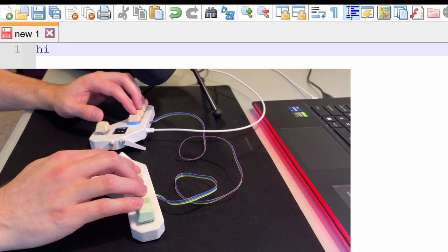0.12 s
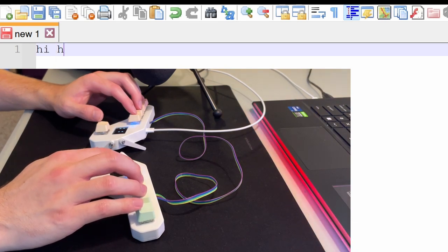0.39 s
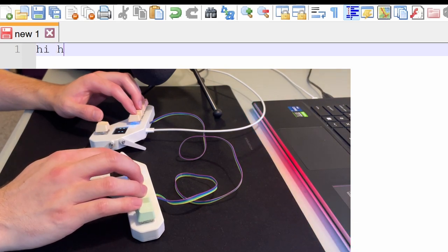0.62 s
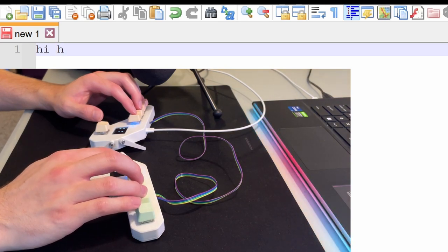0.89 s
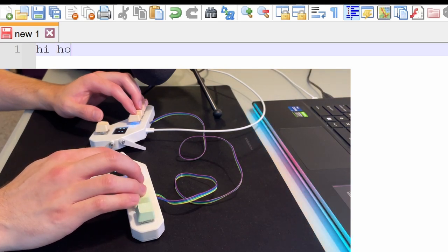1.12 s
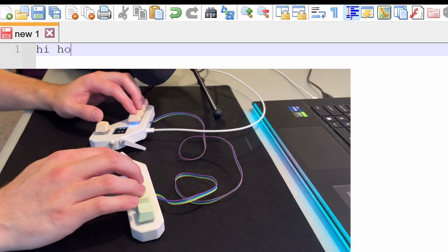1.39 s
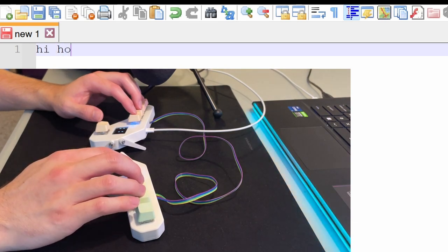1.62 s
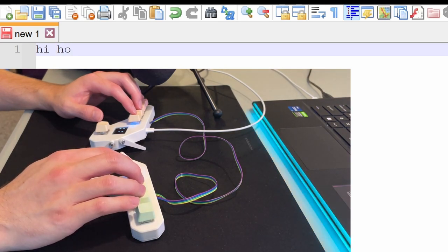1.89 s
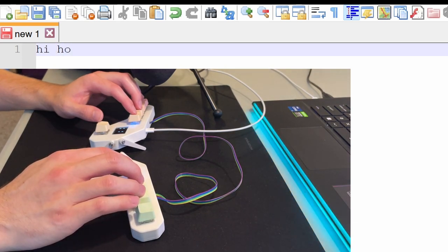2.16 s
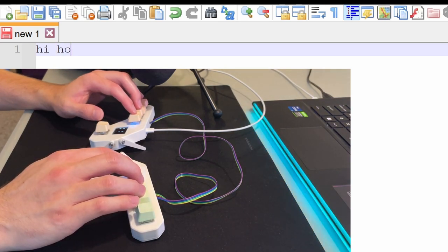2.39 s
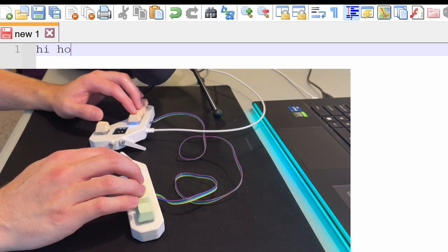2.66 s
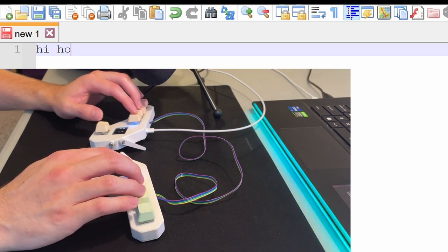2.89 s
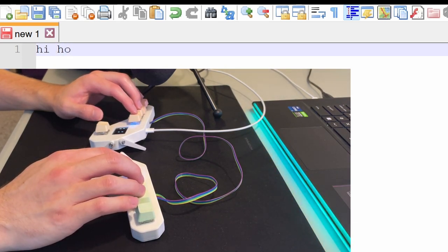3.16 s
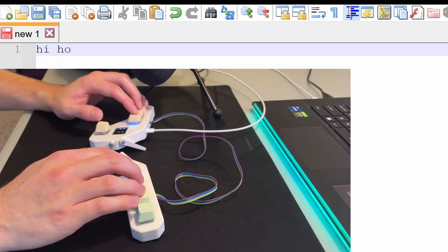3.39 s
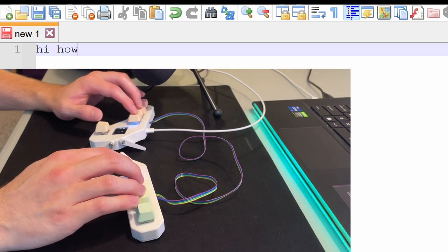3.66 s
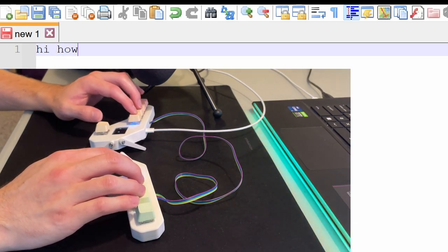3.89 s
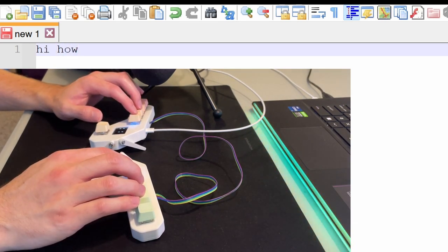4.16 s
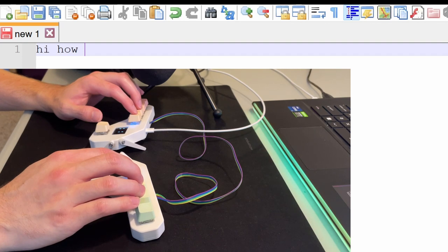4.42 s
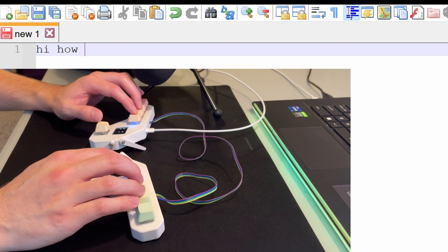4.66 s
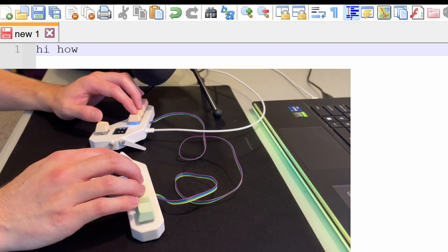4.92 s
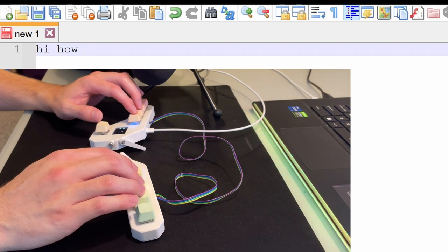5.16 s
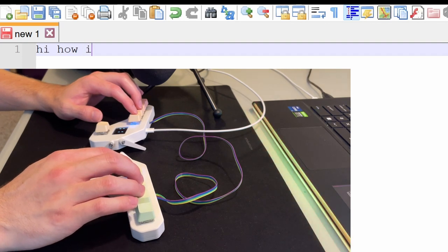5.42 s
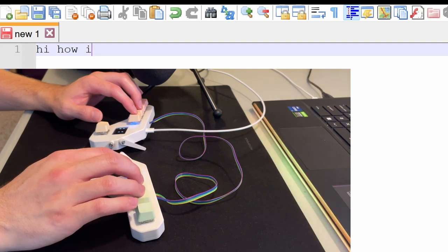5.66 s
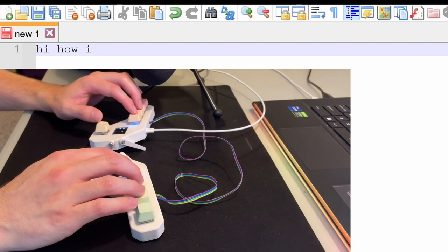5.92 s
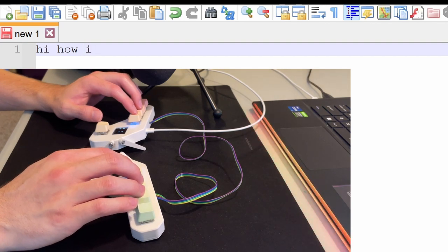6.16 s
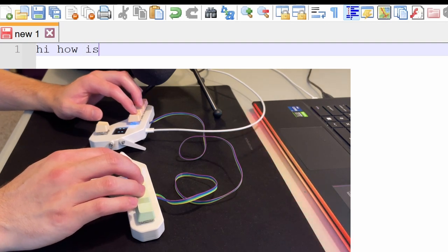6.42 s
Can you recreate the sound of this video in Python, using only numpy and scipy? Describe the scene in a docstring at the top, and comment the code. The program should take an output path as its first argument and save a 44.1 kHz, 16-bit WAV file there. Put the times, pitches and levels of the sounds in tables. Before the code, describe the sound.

Clicky mechanical key switches pressed slowly and unevenly on a desk, sharp bright snaps with duller plastic knocks, close up in a quiet room.

```python
"""Clicky key switches in a quiet room

Key switches in small plastic cases are pressed on a desk: each contact strikes sums of decaying sines,
a bright snap of click jacket and housing with a spring ping, and a duller knock of the stem.
Friction grains excite the same modes as keys travel; the desk sways at one low mode with a rumble.
Sparse reflections make the room, shaped noise the hiss. Two equal paths 11 ms apart double everything;
at times the stream freezes and its strongest tones hang on as steady sines."""
import sys
import numpy as np
from scipy import signal
from scipy.fft import rfft
from scipy.io import wavfile
from scipy.ndimage import uniform_filter1d

SR = 44100
rng = np.random.default_rng(int(sys.argv[2]) if len(sys.argv) > 2 else 0)


def to_wav(s):
    """Save 16-bit WAV."""
    ch = np.atleast_2d(s).T  # columns
    pcm = np.round(np.clip(ch, -1, 1) * 32767)  # PCM
    wavfile.write(sys.argv[1], SR, pcm.astype(np.int16))


def attenuation_scalar(level_db):
    """Turn a level in dB into a linear amplitude multiplier (20 dB per decade)."""
    decades = np.asarray(level_db, float) / 20
    return 10 ** decades


N = 288855

# Key contacts: (time [s], snap level [dB], knock level [dB], nominal contact length [ms])
CONTACTS = [(0.1788, -45, -51, .88), (.192, -13.5, -30, 0.34), (0.2001, -30, -21, 0.65),
            (0.209, -37, -35.5, .74), (0.2945, -32.5, -54, 0.13), (0.3348, -33, -38, 0.8),
            (0.344, -26, -33.5, 0.72), (0.347, -33.5, -42, 1.2), (0.353, -36, -29, 0.37),
            (0.956, -29, -29.5, 1.06), (0.9798, -40, -33, .22), (0.9834, -16, -35.5, 1.16),
            (.992, -27, -22.5, 0.84), (1.0002, -32, -31.5, 0.27), (1.0085, -34, -40, 0.36),
            (1.0958, -41, -53, 1.5), (1.1307, -30, -41, .86), (1.1343, -30.5, -34, 0.097),
            (2.2517, -20, -26, 0.68), (2.262, -4.5, -21, 0.31), (2.265, -24, -40, .5),
            (2.2718, -23.5, -12, 0.63), (2.4372, -45.5, -38, 0.9), (3.4491, -55, -44, 0.89),
            (3.4614, -43, -28.5, 1.2), (3.4762, -29.5, -44, .44), (3.4982, -2.5, -24, 0.68),
            (3.5024, -26, -40, .9), (3.5062, -17.5, -7.5, 0.67), (3.512, -30, -38, .62),
            (3.649, -18, -45, 0.25), (3.655, -10.5, -25, 0.58), (3.6638, -18.5, -26, .37),
            (3.679, -53.5, -36.5, 0.4), (3.8883, -41, -54.5, 0.44), (3.891, -35.5, -51, 0.58),
            (3.8958, -40, -60, 0.77), (3.9059, -24, -41, 0.4), (3.9112, -65, -42, 0.73),
            (3.9485, -22.5, -25.5, 0.47), (3.953, -31.5, -28, 0.34), (4.146, -45.5, -53, .57),
            (4.165, -38, -50, 0.7), (4.177, -14, -30.5, 0.68), (4.1965, -32, -50, 1.2),
            (4.3036, -37, -43.5, 1.3), (4.3215, -26, -32, 0.31), (4.3266, -52.5, -40.5, 1),
            (5.1545, -37.5, -40, 0.33), (5.1608, -11.5, -30, 0.48), (5.1677, -28, -23, 0.56),
            (5.275, -33, -52, .8), (5.302, -37, -43, 0.78), (5.305, -29, -42, 0.79),
            (5.3094, -46, -34, 0.53), (6.2251, -20.5, -25, 0.61), (6.2339, -19, -39.5, 0.41),
            (6.2368, -43, -22.5, 1.3), (6.2393, -3, -23.5, 0.54), (6.2453, -11, -5, 0.32),
            (6.2488, -21.5, -26.5, 0.28), (6.267, -55, -51, .45), (6.3467, -31, -44, .61),
            (6.3508, -32, -44, 0.93), (6.36, -21.5, -37, 0.29), (6.38, -22.5, -38, 1.1),
            (6.3832, -17, -26, 0.55), (6.3852, -45, -29, 1.13)]
# Knock, snap and cap colours from each time on:
# (time [s], main knock [Hz], snap colour [Hz], keycap mode [Hz], keycap mode level [dB])
COLOURS = [(0, 3770, 9800, 5300, -2), (.197, 2984, 10200, 1776, 1.5), (.27, 2920, 8300, 1700, -3),
           (.34, 4060, 8940, 1740, -2), (.35, 2895, 8300, 1700, -5), (.7, 2970, 8700, 1770, -20),
           (.975, 2440, 9170, 3530, -0.5), (1.07, 2990, 6660, 1880, -7), (2.1, 2400, 8550, 1261, -11),
           (3.4, 2830, 7800, 1800, -12), (3.49, 3180, 9140, 2270, 1.5), (3.63, 2806, 8300, 2030, -10.5),
           (3.85, 2365, 8300, 3690, -8), (4.12, 3410, 9600, 1834, -6.5), (4.26, 3180, 10600, 1760, -6.5),
           (5.1, 3700, 9470, 5200, -4.5), (5.165, 2950, 9070, 1840, -3.5), (5.25, 3060, 8560, 1710, -4),
           (6.15, 2430, 9070, 4560, -4.5), (6.32, 2400, 9100, 1500, -13), (6.375, 2416, 8150, 1500, -8)]
# Switch housing and keycap modes: (frequency [Hz], level [dB], T60 [s])
SNAP_MODES = [(5020, -6, 0.0052), (6350, -8.5, 0.012), (7660, 4.5, 0.0032), (8300, -0.5, 0.0024),
              (9820, 1, 0.0028), (10340, -6, 0.0086), (11270, -6.5, 0.0076), (12800, -9.5, .005),
              (14900, -11, 0.0027), (15400, -18, .004)]
# Plastic case modes, nominal for a main knock at NOMINAL_KNOCK_HZ: (frequency [Hz], level [dB], T60 [s])
CASE_MODES = [(1248, -9, .011), (1760, -12, 0.015), (2053, -2, .008), (2400, 1, 0.011),
              (2626, -4.5, 0.0061), (3093, -12.5, 0.0096), (3677, -10, 0.0081), (4420, -8.5, 0.0083)]
# Coil spring pinging on after a snap: (frequency [Hz], level [dB], T60 [s])
SPRING_MODES = [(7900, -38, .07), (9870, -39, .1), (10060, -39, .08)]
# Case on the desk mat: (frequency [Hz], level [dB], T60 [s])
THUD_MODES = [(125, -38, .08), (200, -34, 0.027), (330, -45.5, 0.04), (585, -40.5, 0.022)]
# Stems and fingers rubbing as keys travel: (loudest time [s], case level [dB], housing level [dB])
STROKES = [(.225, -56, -53.5), (.325, -53.5, -50.5), (.79, -71, -84), (1.019, -55.5, -52),
           (1.131, -61, -59.5), (2.251, -64.5, -80), (2.33, -61.5, -72), (3.47, -60, -75),
           (3.58, -60.5, -77), (3.945, -62, -67), (4.14, -66, -73), (4.205, -64, -53.5),
           (5.2, -56.5, -53.5), (5.33, -64.5, -65.5), (6.22, -64, -76.5), (6.359, -56.5, -67.5)]
# Desk swaying as a key is pushed down or let go: (start [s], peak level [dB], frequency [Hz], hold [s])
SWAYS = [(0.191, -45, 92.66, 0.075), (0.359, -47, 90.5, 0.034), (0.972, -49, 93.4, 0.074),
         (1.126, -53.5, 91, .05), (2.26, -38.5, 95, 0.096), (3.446, -44, 91.2, .03),
         (3.491, -35.5, 92.2, 0.077), (3.648, -31.5, 93.2, 0.091), (3.904, -50.5, 88.7, 0.023),
         (3.947, -48, 92.8, 0.12), (4.177, -50, 94.2, 0.064), (5.169, -44.5, 92.2, 0.1),
         (5.306, -45, 95, 0.06), (6.242, -28.5, 91.5, 0.046), (6.395, -52, 94, 0.055)]
# Room decay: (frequency [Hz], T60 [s])
ROOM_T60 = [(300, .1), (1400, 0.22), (2400, 0.14), (5000, 0.11), (8000, 0.23), (10000, 0.056), (14000, 0.1)]
# Room colour: (frequency [Hz], relative level [dB])
ROOM_COLOUR = [(500, -9), (1500, 7), (2500, 0.5), (4500, 5), (6300, -8), (8000, -10.5), (10000, 2),
               (15000, -5)]
# Hiss and rumble spectrum: (frequency [Hz], relative density [dB per Hz])
HISS_SPECTRUM = [(12, -12), (24, 2), (37, -16.5), (54, -2.5), (85, -16), (122, -10.5), (200, -21),
                 (400, -23), (800, -31), (1300, -33.5), (1900, -33), (2600, -27.5), (4500, -29),
                 (9000, -30.5), (16000, -31.5)]
# Stream freezes: (start [s], length [s], level change over the length [dB])
FREEZES = [(.265, .022, -2), (.311, .024, -1), (1.823, .021, -2), (3.21, .021, -2), (3.768, .021, -2),
           (3.954, .023, -5), (6.453, .022, -2)]

NOMINAL_KNOCK_HZ, CAP_T60_S = 2400, 0.013
SHELL_TOP_HZ = 1500  # case modes below keep their pitch throughout
SHELL_DB_PER_DB, FIRM_KNOCK_DB = 0.4, -7.5  # harder knocks reach the shell
CASE_RUB_RISE_DB_PER_S, CASE_RUB_FALL_DB_PER_S = 201.5, 168
HOUSING_RUB_RISE_DB_PER_S, HOUSING_RUB_FALL_DB_PER_S = 208.5, 217
SWELL_S, SAG_DB_PER_S, DAMPED_DB_PER_S = 0.042, 41.5, 301
HISS_DB, ROOM_DB = -60, -20
SECOND_PATH_SAMPLES, EDGE_HZ = 477, 15900


def keys():
    """Each contact releases a crack, snap, spring ping, knock and faint thud."""
    knocks, snaps, thuds = np.zeros(N), np.zeros(N), np.zeros(N)
    chance = rng.standard_normal((len(CONTACTS), 3, 400))
    ping, thud = decaying_modes(SPRING_MODES, 0.15), decaying_modes(THUD_MODES, 0.17)
    t_ms = np.arange(400) * 1000 / SR
    hz, db, t60_s = np.transpose(SNAP_MODES)
    for (start_s, snap_db, knock_db, contact_ms), draws in zip(CONTACTS, chance):
        snap_draw, knock_draw, crack_draw = draws
        snap_hz = colours_at(start_s)[1]
        contact_ms = max(contact_ms, 0.1)
        # modes near the snap colour ring loudest
        octaves_off = np.log2(hz / snap_hz)
        near_db = -12 * np.minimum((octaves_off / 0.34) ** 2, 1.3)
        crack_envelope = (1 - np.exp(-t_ms / 0.087)) * np.exp(-t_ms / (1.1 * contact_ms))
        crack = np.diff(crack_draw, prepend=0) * crack_envelope
        snap = ring(hz, db + near_db, t60_s, 1.2 * contact_ms, 0.087 * contact_ms, 0.9, snap_draw)
        modes = case_modes(start_s, knock_db)
        knock = ring(*modes.T, 1.8 * contact_ms, 0.95 * contact_ms, 0.41, knock_draw)
        add(snaps, start_s, attenuation_scalar(snap_db - 14) * crack)
        add(snaps, start_s, attenuation_scalar(snap_db) * snap)
        add(knocks, start_s, attenuation_scalar(snap_db) * ping)
        add(knocks, start_s, attenuation_scalar(knock_db) * knock)
        add(thuds, start_s, attenuation_scalar(knock_db) * thud)
    jacket = signal.butter(2, 2200, "high", fs=SR, output="sos")  # the jacket is tiny
    return small_body(knocks + signal.sosfilt(jacket, snaps)) + thuds


def ring(hz, db, t60_s, contact_ms, rise_ms, rattle, chance):
    """One firm touch and a short rattle strike the modes; the smoothed peak is scaled to 1."""
    t = np.arange(1200)[:, None] / SR
    detune = 1 + 0.019 * chance[-len(hz):]  # pitches vary a little from contact to contact
    soft = 1 - np.exp(-(t * 1000 / rise_ms) ** 2)  # plastic yields before it rings
    phase = 2 * np.pi * (hz * detune * t + chance[-30:][:len(hz)])
    body = (attenuation_scalar(db - 60 * t / t60_s) * soft * np.sin(phase)).sum(1)
    contacts_elapsed = t[:len(chance), 0] * 1000 / max(contact_ms, 0.05)
    drive = chance * contacts_elapsed * np.exp(-contacts_elapsed)
    drive *= rattle / np.linalg.norm(drive)
    drive[0] = 1
    sound = np.convolve(body, drive)
    return sound / np.sqrt(uniform_filter1d(2 * sound ** 2, size=26).max())


def decaying_modes(modes, seconds):
    """Sum of exponentially decaying sines with a soft onset."""
    hz, db, t60_s = np.transpose(modes)
    t = np.arange(round(seconds * SR))[:, None] / SR
    envelope = attenuation_scalar(db - 60 * t / t60_s) * (1 - np.exp(-t * hz))
    return (envelope * np.sin(2 * np.pi * hz * t)).sum(1)


def colours_at(time_s):
    """Knock, snap and cap colour at this time."""
    return [row for row in COLOURS if row[0] <= time_s][-1][1:]


def case_modes(time_s, knock_db):
    """Fixed-pitch shell modes, modes that scale with the main knock, and the cap mode at this time."""
    knock_hz, _, cap_hz, cap_db = colours_at(time_s)
    modes = []
    for hz, db, t60_s in CASE_MODES:
        if hz < SHELL_TOP_HZ:
            modes.append((hz, db + SHELL_DB_PER_DB * (knock_db - FIRM_KNOCK_DB), t60_s))
        else:
            modes.append((hz * knock_hz / NOMINAL_KNOCK_HZ, db, t60_s))
    return np.array(modes + [(cap_hz, cap_db, CAP_T60_S)])


def small_body(x):
    """A case this small radiates little below 1 kHz."""
    return signal.sosfilt(signal.butter(7, 960, "high", fs=SR, output="sos"), x)


def rubs():
    """Dense uneven friction grains excite case and housing modes more evenly than a blow does."""
    out = np.zeros(N)
    t = np.arange(-0.15, 0.25, 1 / SR)
    taper = signal.windows.tukey(len(t), 0.1)
    for peak_s, case_db, housing_db in STROKES:
        layers = [(case_db, case_modes(peak_s, -36.5), CASE_RUB_RISE_DB_PER_S, CASE_RUB_FALL_DB_PER_S),
                  (housing_db, SNAP_MODES, HOUSING_RUB_RISE_DB_PER_S, HOUSING_RUB_FALL_DB_PER_S)]
        for db, modes, rise, fall in layers:
            strength = rng.standard_normal(len(t)) * attenuation_scalar(2 * rng.exponential(1, len(t)))
            grains = strength * (rng.random(len(t)) < 2500 / SR)  # about 2500 grains per second
            body = decaying_modes(np.array(modes) * [1, 0.45, 0.45], 0.03)  # evener levels, shorter ring
            sound = unit_rms(small_body(signal.oaconvolve(grains, body)[:len(t)]))
            envelope = attenuation_scalar(db + np.minimum(rise * t, -fall * t))
            add(out, peak_s + t[0], envelope * sound * taper)
    return out


def desk():
    """One low mode of the desk top swells, holds and is damped; a dull frame rumble follows it."""
    t = np.arange(SR // 2) / SR
    band = signal.butter(2, [35, 70], "band", fs=SR, output="sos")
    rumble = unit_rms(signal.sosfilt(band, rng.standard_normal(N)))
    power = np.zeros(N)
    for start_s, db, _, hold_s in SWAYS:
        sag_db = SAG_DB_PER_S * np.clip(t - SWELL_S, 0, hold_s)
        damping_db = DAMPED_DB_PER_S * np.maximum(t - SWELL_S - hold_s, 0)
        swell = np.sin(np.pi / 2 * np.minimum(t / SWELL_S, 1)) ** 2
        add(power, start_s, (attenuation_scalar(db - sag_db - damping_db) * swell) ** 2)
    start_s, _, hz, _ = np.transpose(SWAYS)
    latest = np.maximum(np.searchsorted(start_s, np.arange(N) / SR) - 1, 0)
    cycles = np.cumsum(hz[latest]) / SR + rng.random()
    sway = np.sqrt(power) * np.sin(2 * np.pi * cycles)
    return sway + attenuation_scalar(-25) * power ** 0.35 * rumble


def room(x):
    """Sparse reflections of random sign, each band dying at its own speed."""
    taps = np.zeros(SR // 2)
    at = np.arange(60, len(taps) - 12, 12)
    taps[at + rng.integers(0, 12, len(at))] = rng.choice([-1., 1.], len(at))
    hz, t, z = signal.stft(taps, SR, nperseg=128)
    decay = attenuation_scalar(-60 * t / read(ROOM_T60, hz)[:, None])
    tail = signal.istft(z * decay, SR, nperseg=128)[1]
    gains = attenuation_scalar(read(ROOM_COLOUR, np.linspace(0, SR / 2, 128)))
    colour = signal.firwin2(255, np.linspace(0, 1, 128), gains)
    tail = signal.lfilter(colour, 1, tail)[127:]  # filter delay removed
    return signal.fftconvolve(x, tail / np.linalg.norm(tail))[:N]


def hiss():
    """Microphone hiss and room rumble: shaped noise with faint drifting patches."""
    frames, hz = N // 512 + 5, np.fft.rfftfreq(2048, 1 / SR)
    real, imag, patches = rng.standard_normal((frames, 1025, 3)).T
    patches = uniform_filter1d(patches, size=30, axis=0)
    patches = unit_rms(uniform_filter1d(patches, size=10, axis=1))
    z = (real + 1j * imag) * attenuation_scalar(read(HISS_SPECTRUM, hz)[:, None] + 0.66 * patches)
    noise = signal.istft(z, nperseg=2048, noverlap=1536)[1][:N]
    return attenuation_scalar(HISS_DB) * unit_rms(noise)


def unit_rms(x):
    """Scales to an RMS of 1."""
    return x / np.sqrt(np.mean(x ** 2) + 1e-20)


def read(points, hz):
    """Interpolates a table over log frequency."""
    f, value = np.transpose(points)
    return np.interp(np.log(hz + 1), np.log(f + 1), value)


def add(mix, start_s, sound):
    """Adds a sound in place, cut at the end of the mix."""
    part = mix[round(start_s * SR):][:len(sound)]
    part += sound[:len(part)]


def scene():
    """Keys, their room, rubs, desk and hiss."""
    clicks = keys()
    return (clicks + attenuation_scalar(ROOM_DB) * room(clicks) + rubs() + desk() + hiss())[None]


def frozen(x, count=9, size=140):
    """In a freeze the strongest tones of the moment before carry on as sines under a fade."""
    out = x.copy()
    low = uniform_filter1d(uniform_filter1d(x, size=40), size=40)  # the bass runs on
    for start_s, length_s, fade_db in FREEZES:
        i, t = round(start_s * SR), np.arange(round(length_s * SR))
        z = rfft((x - low)[i - size:i] * np.hanning(size), 1024) * 4 / size
        tops = signal.find_peaks(abs(z), distance=2 * count)[0]
        tops = tops[np.argsort(-abs(z[tops]))[:count]]
        turns = tops * (t[:, None] + size) / 1024
        held = (z[tops] * np.exp(2j * np.pi * turns)).real.sum(1)
        held = held * attenuation_scalar(fade_db * t / len(t)) + low[i:i + len(t)]
        blend = signal.windows.tukey(len(t), 0.3)
        out[i:i + len(t)] = blend * held + (1 - blend) * x[i:i + len(t)]
    return out


def low_pass(x):
    """Removes everything above the highest recorded frequency."""
    return signal.sosfilt(signal.butter(12, 17150, fs=SR, output="sos"), x)


def record(dry):
    """Freezes the stream, doubles it by the second path and limits the band."""
    stream = frozen(dry[0])
    delayed = np.pad(stream, (SECOND_PATH_SAMPLES, 0))[:N]
    both = (stream + delayed) / 2
    edge = signal.firwin(255, EDGE_HZ, window=("kaiser", 5), fs=SR)
    mix = signal.oaconvolve(both, edge, "same")[None]
    return low_pass(mix)


dry = scene()
out = record(dry)
to_wav(out)
```